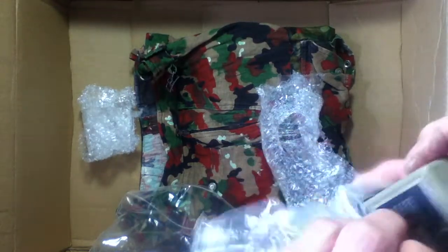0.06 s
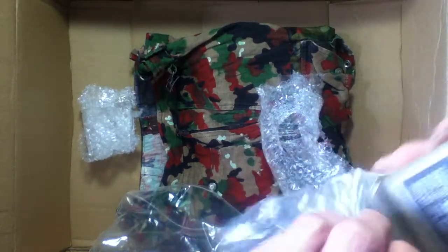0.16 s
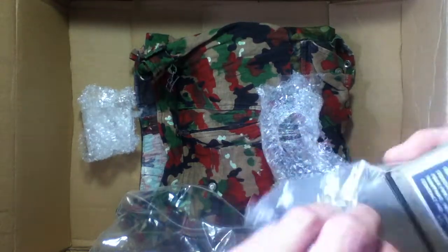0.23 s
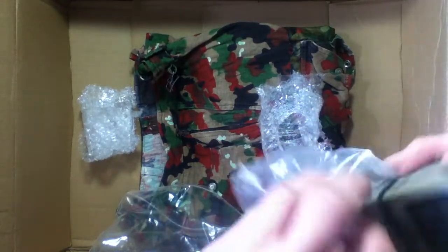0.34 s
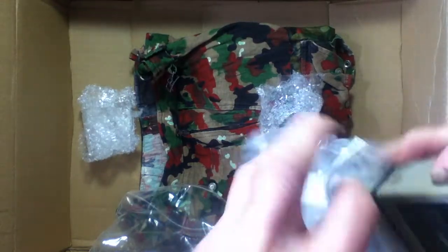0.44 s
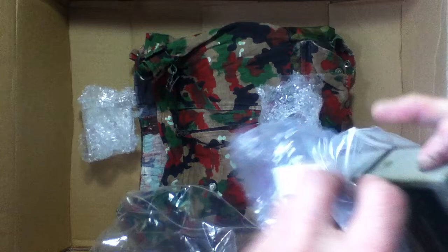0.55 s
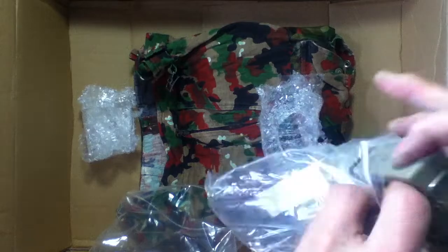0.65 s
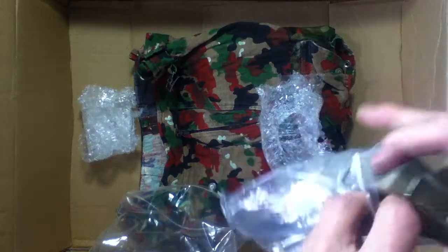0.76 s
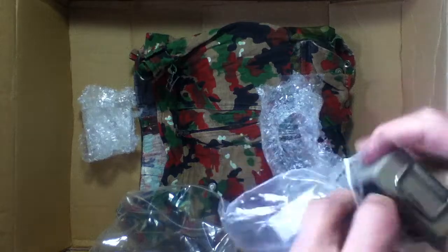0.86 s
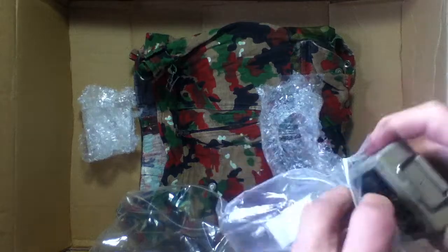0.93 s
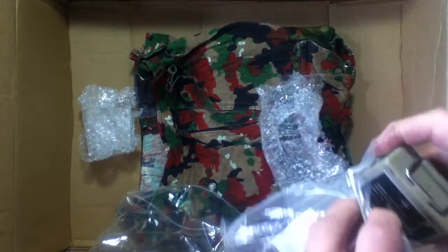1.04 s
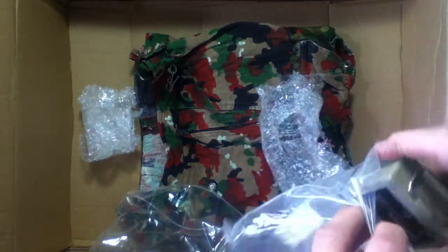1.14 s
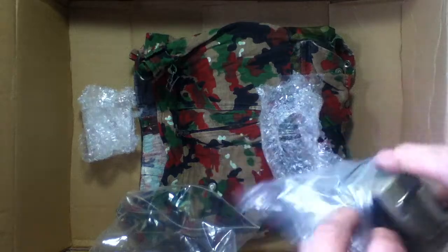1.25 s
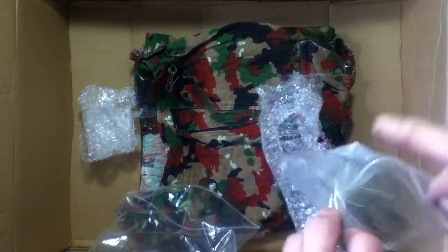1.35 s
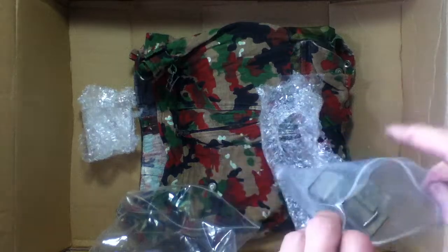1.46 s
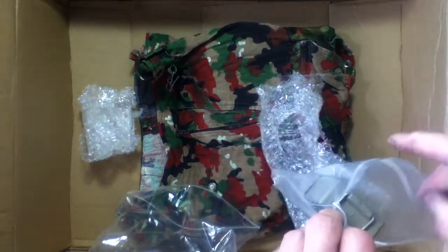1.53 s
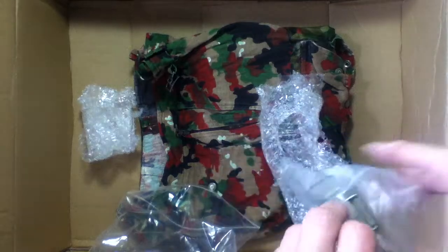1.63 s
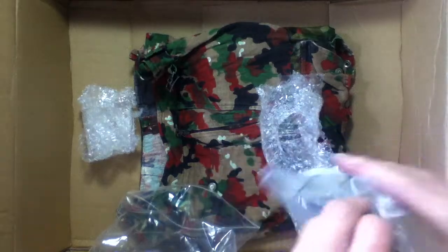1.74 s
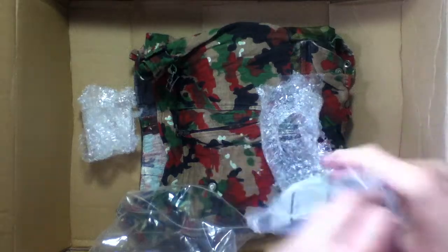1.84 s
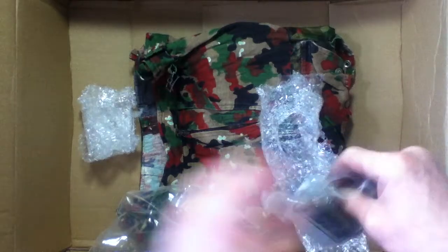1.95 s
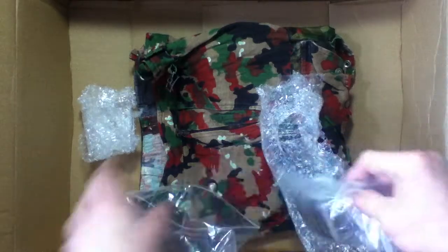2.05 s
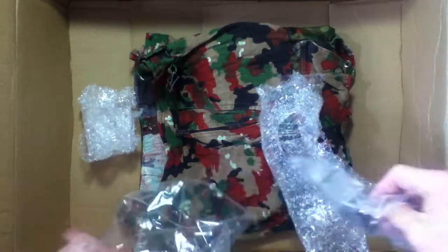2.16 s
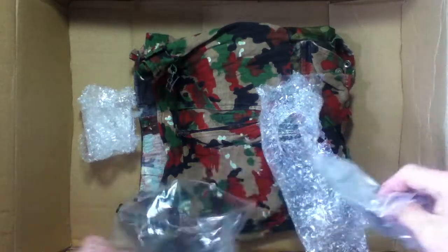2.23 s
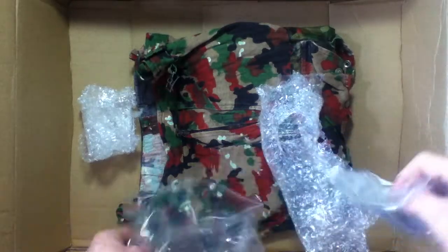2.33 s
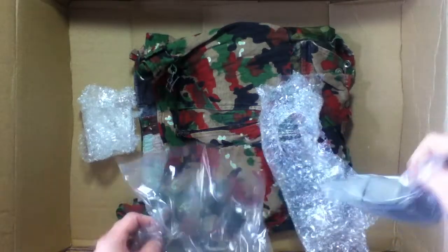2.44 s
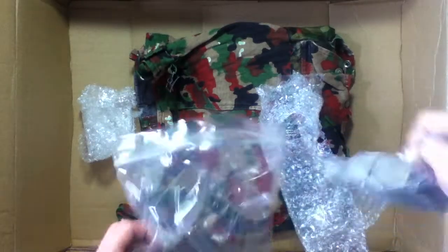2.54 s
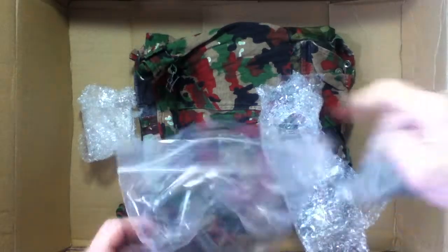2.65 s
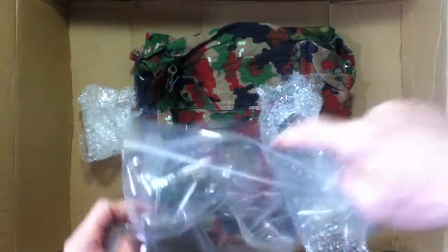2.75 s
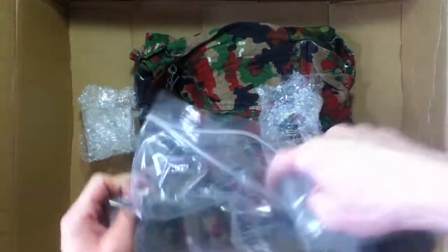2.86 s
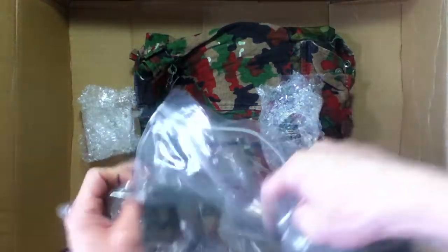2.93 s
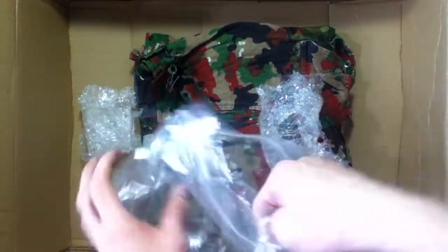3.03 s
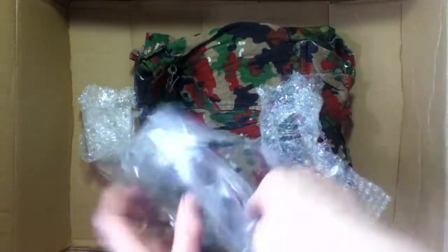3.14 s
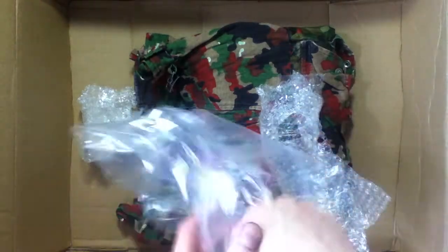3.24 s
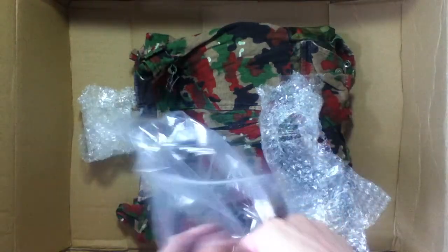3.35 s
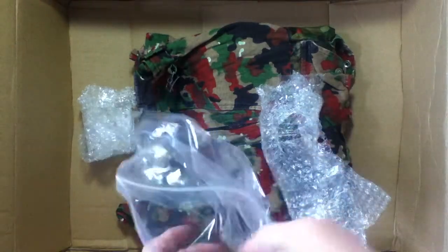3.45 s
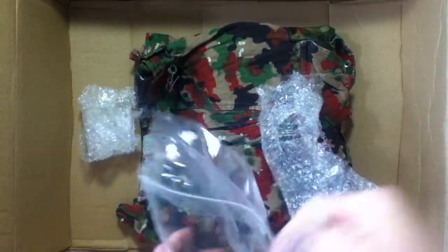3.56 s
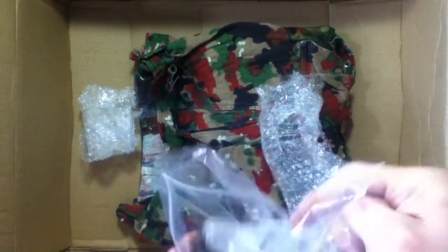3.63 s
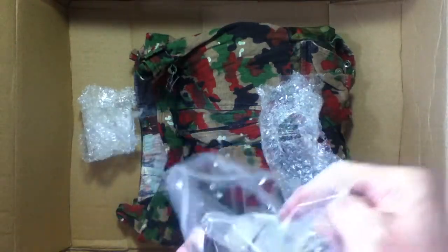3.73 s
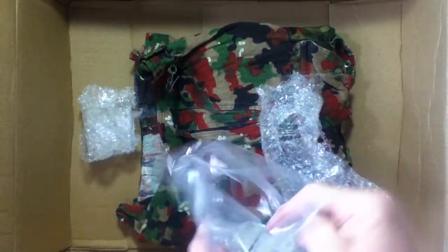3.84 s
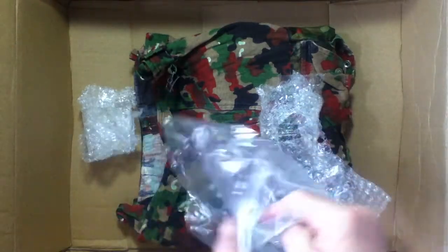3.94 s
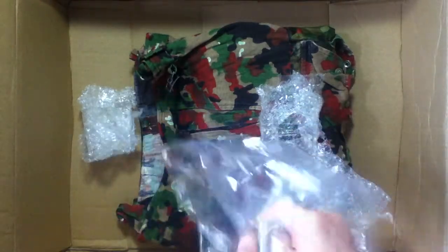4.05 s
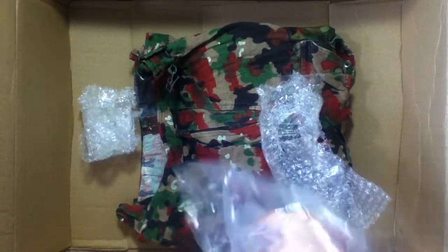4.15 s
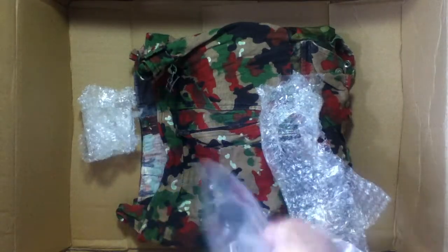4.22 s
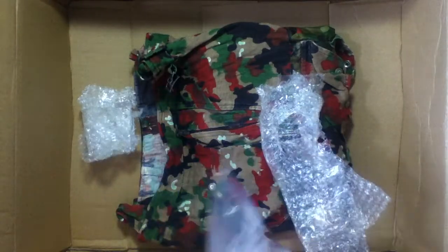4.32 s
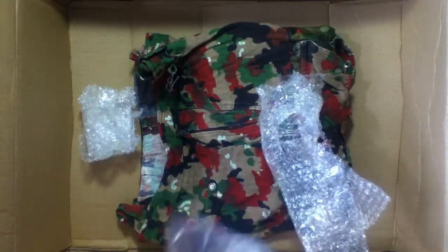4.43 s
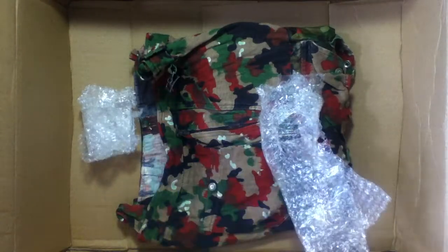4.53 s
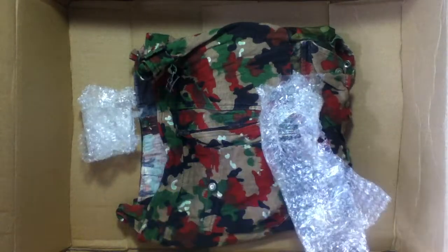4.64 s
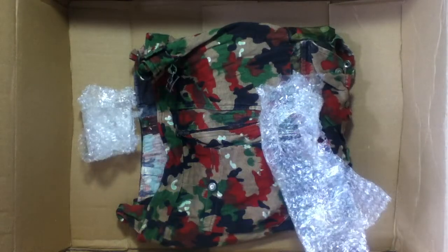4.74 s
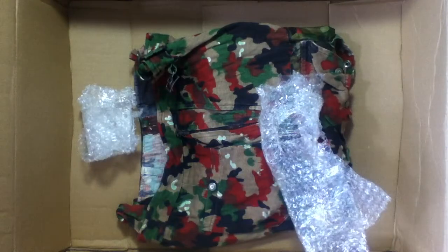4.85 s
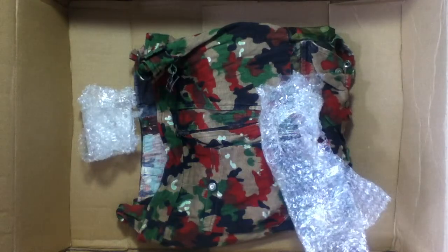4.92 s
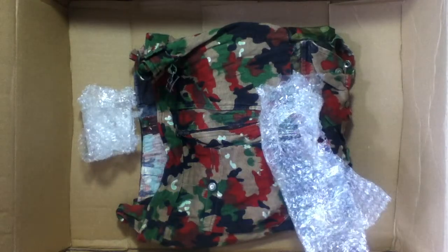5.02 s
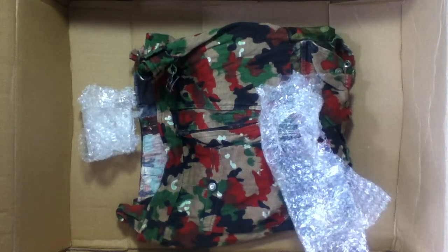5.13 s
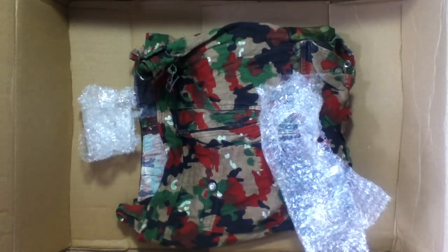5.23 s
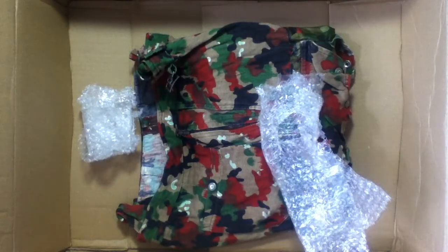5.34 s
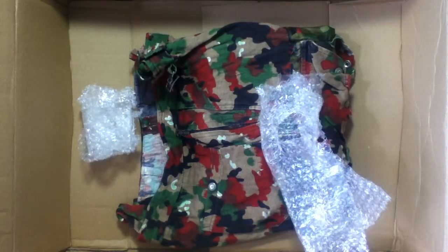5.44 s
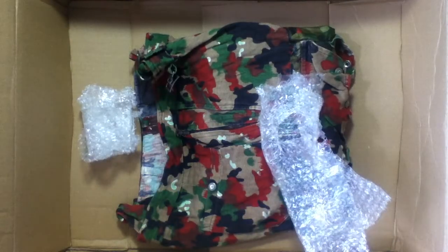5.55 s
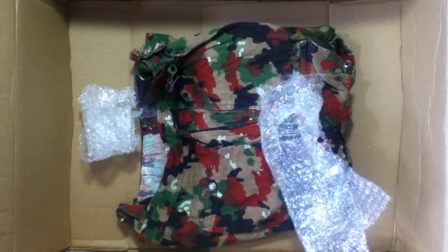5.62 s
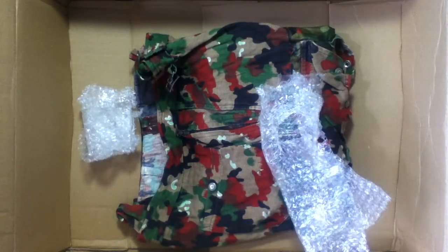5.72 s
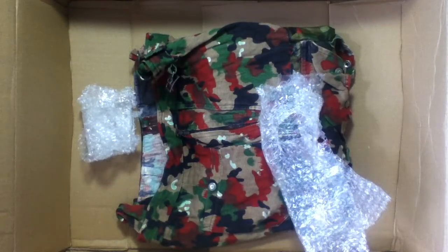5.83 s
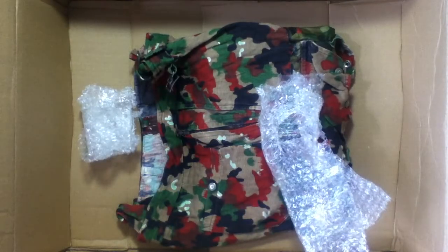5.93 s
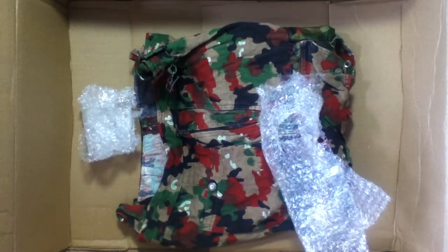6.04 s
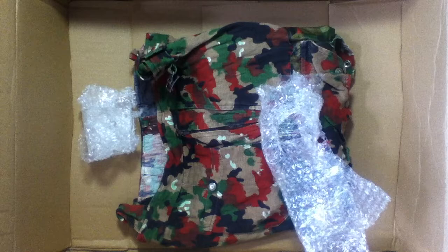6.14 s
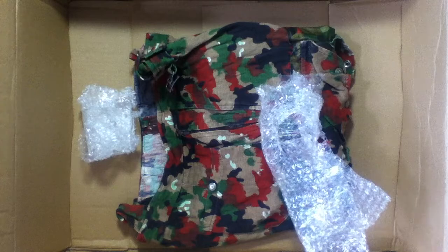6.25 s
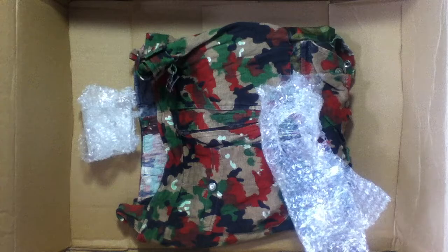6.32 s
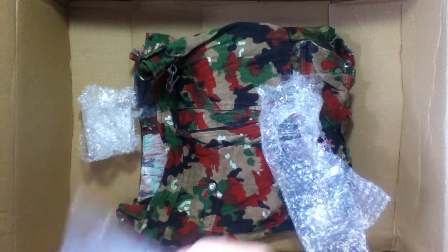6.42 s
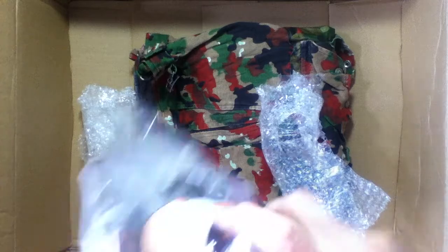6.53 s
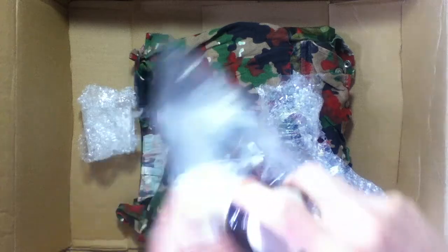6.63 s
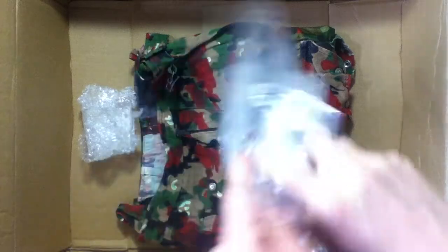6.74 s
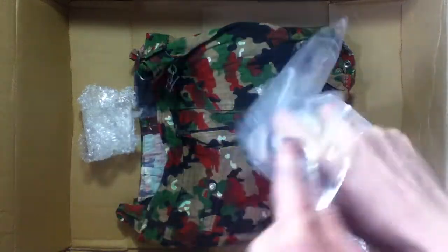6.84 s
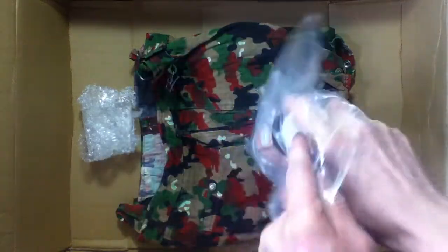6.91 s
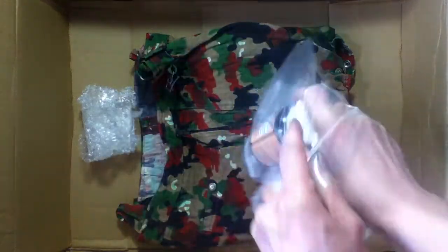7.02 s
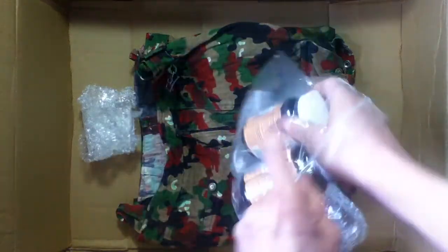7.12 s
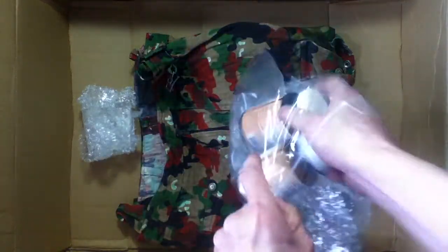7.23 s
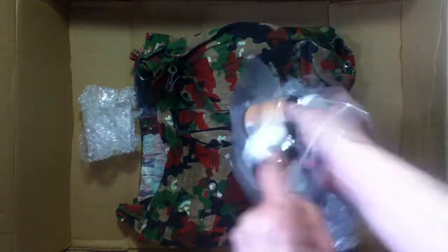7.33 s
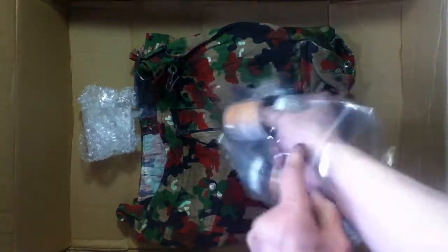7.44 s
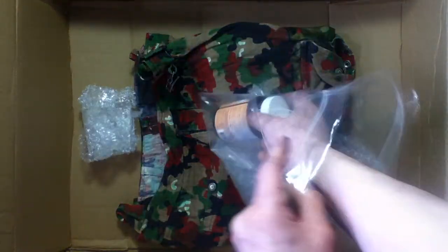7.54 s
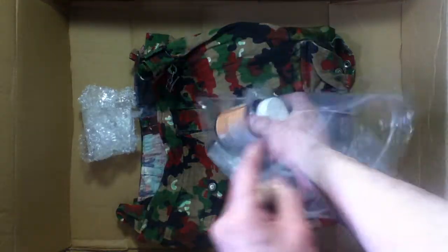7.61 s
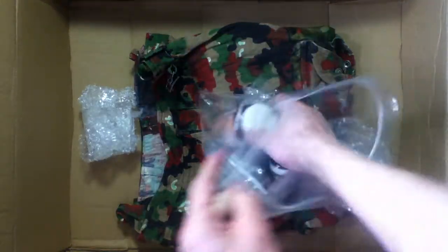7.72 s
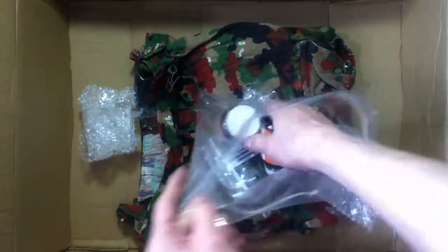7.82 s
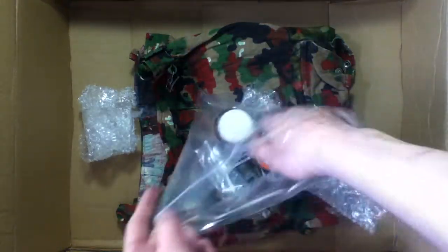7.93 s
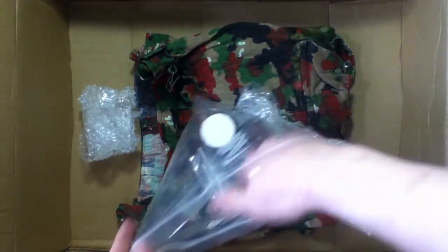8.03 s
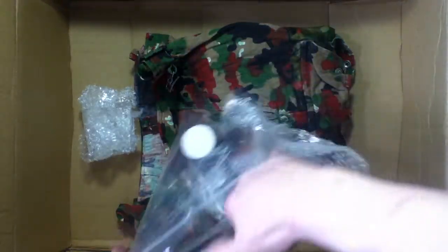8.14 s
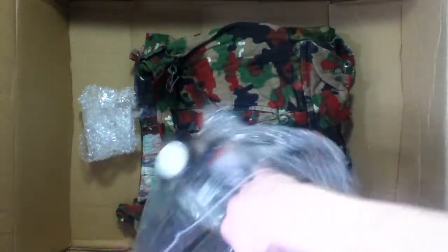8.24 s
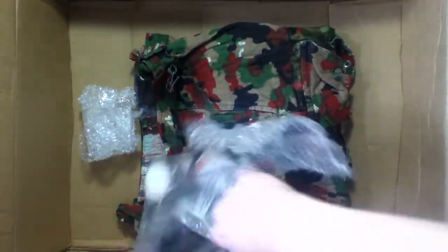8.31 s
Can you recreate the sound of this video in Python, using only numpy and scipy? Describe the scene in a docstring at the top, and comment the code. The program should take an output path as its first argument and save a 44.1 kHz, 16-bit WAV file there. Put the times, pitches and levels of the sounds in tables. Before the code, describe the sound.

Hands crumple plastic wrapping over a cardboard box, knocking the box, before a small hard object rattles and clicks sharply.

```python
"""Over an open cardboard box, close to the microphone, hands crumple a thin plastic bag and bubble wrap.
The film buckles in clumps of tiny snaps and some loud cracks, over a sliding hiss and a low rustle.
Knuckles bump the box and its panel booms. Late on, a small hard object with a metal part drags and
rattles, then clicks once sharply. Reflections from the box and the room follow, above a faint hush."""
import sys
import numpy as np
from scipy import signal
from scipy.fft import rfft, irfft, next_fast_len
from scipy.io import wavfile

SR = 44100
rng = np.random.default_rng(int(sys.argv[2]) if len(sys.argv) > 2 else 0)


def int16_out(signal):
    """Quantize to a 16-bit WAV file."""
    q = np.round(np.clip(np.atleast_2d(signal).T, -1, 1) * 32767)
    wavfile.write(sys.argv[1], SR, q.astype(np.int16))


N = 369293

# Levels are relative, ahead of filters and reflections.
# spectrum of the background hush: frequency_hz, density_db
HUSH_SPECTRUM = [(15, -50), (25, 0), (113, -6.5), (371, -11.5), (540, -16), (834, -13.5), (1400, -21),
                 (4500, -22), (15800, -26)]
# knuckles on the box: start_s, level_db, pitch_hz, t60_s
KNUCKLE_BUMPS = [(1.511, -23.5, 121, 0.047), (2.317, -35.5, 174, 0.12), (2.722, -41.5, 223, .06),
                 (3.346, -37, 280, 0.12), (4.405, -8.5, 161, 0.15), (4.603, -31.5, 155, 0.39),
                 (5.078, -40, 357, 0.036), (5.62, -33, 388, 0.039), (6.748, -27, 634, 0.054)]
# modes of the metal part: pitch_hz, level_db, t60_s
METAL_MODES = [(4240, -1, 0.01), (6420, -5, .03), (6630, -11, 0.1), (9400, -12, 0.045), (9660, -3, 0.045),
               (10750, -9, 0.02)]
# the object dragging over a rough edge: time_s, casing_db, metal_db
DRAG_LEVELS = [(6.19, -87, -88), (6.21, -55, -56), (6.31, -60, -58), (6.317, -34, -66), (6.41, -39, -66),
               (6.44, -55, -68), (6.46, -72, -86)]
# impacts of the object: start_s, level_db, casing_pitch_hz, metal_gain_db
OBJECT_IMPACTS = [(6.3135, -25, 2100, -30), (6.3178, -14, 2130, -30), (6.342, -19, 2150, -16),
                  (6.3645, -17, 2000, -16), (6.3895, -18, 2000, -21), (6.4035, -19, 2130, -32),
                  (6.414, -22, 1900, -22), (6.436, -27, 1850, -26), (7.7539, 2, 2500, -11),
                  (7.7712, -13, 2000, -8), (8.17, -28, 1500, -26)]
# squeezes and tugs of the film: full_grip_s, held_s, level_db
SQUEEZES = [(0.0, 0.014, -37), (0.192, 0.038, -38), (0.519, 0.017, -39), (0.769, 0.043, -34),
            (1.02, 0.047, -43), (1.38, 0.083, -39), (1.516, 0.0063, -21.5), (1.798, 0.0091, -36.5),
            (2.069, 0.034, -30.5), (2.188, 0.016, -33.5), (2.362, 0.14, -40.5), (2.597, 0.016, -33),
            (2.679, 0.019, -38.5), (3.12, 0.018, -40.5), (3.26, 0.024, -40.5), (3.35, 0.013, -31.5),
            (3.449, 0.085, -39.5), (3.678, 0.003, -42), (3.97, 0.11, -45), (4.138, 0.1, -35),
            (4.318, 0.083, -30), (4.51, 0.037, -37), (4.68, 0.086, -42.5), (4.84, 0.024, -35),
            (5.14, 0.065, -53), (5.75, 0.018, -58.5), (6.641, 0.0046, -38), (6.84, 0.14, -34),
            (7.03, 0.031, -35), (7.231, 0.035, -32.5), (7.419, 0.14, -32.5), (7.654, 0.07, -30.5),
            (7.94, 0.074, -43), (8.32, 0.046, -39.5)]
# crinkle of the film carried between squeezes: time_s, level_db
CARRY_LEVELS = [(0.0, -63), (0.3, -41.5), (1.4, -44.5), (1.62, -56), (1.85, -37), (2.2, -45.5),
                (2.9, -48.5), (3.2, -42), (3.6, -50), (3.8, -80), (3.98, -35.5), (4.85, -45), (4.97, -58.5),
                (5.9, -66), (6.05, -79), (6.45, -79.5), (6.8, -39), (7.11, -41), (7.7, -36.5),
                (7.77, -49.5), (8.37, -58.5)]
# tone balance of the film: time_s, rustle_gain_db, treble_lift_db
FILM_BALANCE = [(0, -6.5, -0.5), (0.698, -10, 5.5), (1.52, -6.5, 1), (2.2, -11, 2), (3.7, -5.5, -0.5),
                (5.0, -6.5, 3), (5.8, 2, 0), (6.4, -9, 0), (6.75, -2.5, 1), (7.1, -9, 3.5),
                (8.37, -5.5, -1.5)]
# spectrum of the low rustle: frequency_hz, density_db
RUSTLE_SPECTRUM = [(18, -50), (30, -8), (319, -1.5), (1300, -3), (1690, -4), (2860, -120)]
# loud single creases: start_s, level_db, pitch_hz
CREASE_CRACKS = [(0.0629, -13.5, 4100), (0.159, -14.5, 2120), (0.236, -15, 8000), (0.31, -10.5, 4500),
                 (0.3696, -11, 3130), (0.4812, -12, 4230), (0.648, -13, 4760), (0.9165, -15, 1460),
                 (1.1992, -11.5, 3160), (1.233, -2.5, 3220), (1.2769, -13, 3770), (1.366, -10.5, 2980),
                 (1.503, -12, 3500), (1.5128, -11, 3300), (1.5171, -3.5, 5600), (1.5198, -7, 1100),
                 (1.525, -12, 2400), (1.53, -14, 3800), (1.82, -20, 1810), (1.865, -18, 2820),
                 (1.984, -13, 6000), (2.1544, -11.5, 3400), (2.1945, -12.5, 2250), (2.2342, -11.5, 4240),
                 (2.448, -16, 2900), (2.5836, -18, 3950), (2.7918, -15, 5300), (3.122, -21, 2030),
                 (3.1982, -12.5, 4270), (3.2736, -12, 3760), (3.3448, -16, 4900), (3.501, -20, 3800),
                 (3.5432, -1.5, 3700), (3.665, -14, 3100), (3.693, -14.5, 4330), (3.829, -29, 3100),
                 (3.8431, -19.5, 3600), (3.905, -25, 3120), (3.9587, -9.5, 2500), (3.9915, -8, 4070),
                 (4.1265, -11.5, 1640), (4.8209, -14.5, 1160), (4.9971, -32, 1930), (5.008, -31, 4170),
                 (5.0259, -28.5, 1390), (5.082, -27, 8550), (5.114, -25, 6000), (5.2299, -20, 3700),
                 (5.3471, -24, 4500), (5.508, -28.5, 4520), (5.8462, -24.5, 5240), (5.901, -18.5, 7760),
                 (6.4627, -15, 6560), (6.6339, -16.5, 2280), (6.751, -10, 6250), (6.771, -13, 3970),
                 (6.832, -5.5, 2600), (7.05, -7.5, 5000), (7.4115, -7.5, 6000), (7.442, -8, 5930)]
# spectrum imposed on the crinkle: frequency_hz, gain_db
FILM_SPECTRUM = [(530, -18), (900, -10.5), (2160, -3.5), (2740, -1.5), (6590, -5.5), (12400, -16),
                 (15800, -21.5)]

USUAL_EFFORT_DB = -40   # reference for firm and light handling
TIME_S = np.arange(N) / SR


def from_db(db):
    """Decibels to amplitude ratio."""
    return 10 ** (np.asarray(db) / 20)


def rms_one(x):
    """Normalisation to unit rms."""
    return x / np.sqrt(np.mean(x ** 2) + 1e-20)


def butterworth(x, hz, kind):
    """Maximally flat filtering."""
    return signal.sosfilt(signal.butter(2, hz, kind, fs=SR, output="sos"), x)


def coloured(x, spectrum):
    """Spectral shaping along a log-frequency curve, at unit rms."""
    size = next_fast_len(N)
    hz = np.maximum(np.arange(size // 2 + 1) * SR / size, 1)
    points_hz, points_db = np.transpose(spectrum)
    gain = from_db(np.interp(np.log(hz), np.log(points_hz), points_db))
    return rms_one(irfft(rfft(x, size) * gain, size)[:N])


def drift(rate_hz):
    """Low-passed noise: a slow random fluctuation of about unit spread."""
    r = np.exp(-2 * np.pi * rate_hz / SR)
    return rms_one(signal.lfilter([1], [1, -2 * r, r * r], rng.standard_normal(N + SR))[SR:])


def ring(force, hz, t60):
    """Damped resonator: a unit impulse starts a decaying sine of height 1."""
    r, w = 10 ** (-3 / (t60 * SR)), 2 * np.pi * hz / SR
    return signal.lfilter([0, np.sin(w)], [1, -2 * r * np.cos(w), r * r], force + 1e-18)


def fade(t60, size):
    """Exponential decay of 60 dB in t60 seconds."""
    return 10 ** (-3 * np.arange(size) / SR / t60)


def add(out, start_s, sound, peak_db):
    """Superposition of one event at a given peak level."""
    i = round(start_s * SR)
    out[i:i + len(sound)] += (from_db(peak_db) * sound / np.abs(sound).max())[:N - i]


def hush():
    """Stationary noise, strongest in the bass, forms a faint floor."""
    return from_db(-55) * coloured(rng.standard_normal(N), HUSH_SPECTRUM)


def reverberate(x, level_db, t60, hop_s):
    """Reverberation: dense reflections join the direct sound, their pattern changing as the hands move."""
    hop, size = int(hop_s * SR), int(t60 * SR)
    out, window = np.zeros(N + 4 * hop + size), np.hanning(2 * hop)
    padded = np.concatenate([np.zeros(hop), x, np.zeros(2 * hop)])
    for i in range(0, N + hop, hop):
        tail = rng.standard_normal(size) * fade(t60, size)
        piece = signal.fftconvolve(padded[i:i + 2 * hop] * window, tail / np.sqrt(np.sum(tail ** 2)))
        out[i:i + len(piece)] += piece
    return x + from_db(level_db) * out[hop:hop + N]


def box_bumps(scuff_db):
    """Panel resonance: a soft knuckle pushes the cardboard in and out; it booms and the skin scuffs."""
    out, size = np.zeros(N), SR // 3
    for start_s, db, hz, t60 in KNUCKLE_BUMPS:
        push, length = np.zeros(size), int(1.6 * SR / hz)
        push[:length] = np.hanning(length) * np.sin(2 * np.pi * hz * np.arange(length) / SR)
        boom = ring(push, hz, t60) + .5 * ring(push, hz * .72, t60) + .5 * ring(push, hz * 1.6, t60 * .55)
        hand_damping = .12 + np.exp(-(np.arange(size) * hz / SR / 6.8) ** 6)
        add(out, start_s, boom * hand_damping, db)
        rub = rng.standard_normal(size)[:3 * length] * np.hanning(3 * length)
        add(out, start_s, butterworth(rub, [.5 * hz, 2 * hz], "band"), min(scuff_db, db))
    return out


def object_drag(slips_per_s, casing_hz, casing_t60):
    """Stick-slip friction: dense uneven slips keep the casing and the middle metal modes sounding."""
    times_s, casing_db, metal_db = np.transpose(DRAG_LEVELS)
    slips = (rng.random(N) < slips_per_s / SR) * rng.standard_normal(N)
    slips *= from_db(2.6 * np.minimum(rng.exponential(1, N), 2))
    grit = rms_one(butterworth(slips, [2600, 6000], "band"))
    # the lower casing mode takes over as the drag slows
    late = np.clip((TIME_S - times_s[3]) / (times_s[5] - times_s[3]), 0, 1)
    upper = ring(slips * (1 - late / 2), casing_hz, casing_t60)
    lower = ring(slips * late, casing_hz * .9, casing_t60)
    casing = rms_one(upper + lower) + from_db(-8) * grit
    casing *= from_db(np.interp(TIME_S, times_s, casing_db))
    metal = rms_one(sum(ring(slips, hz, t60) for hz, _, t60 in METAL_MODES[1:4]))
    return casing + from_db(np.interp(TIME_S, times_s, metal_db)) * metal


def object_impacts(base_t60, chatter_t60, crack_db):
    """Impact excitation: each contact cracks drily and rings the casing and its own mix of metal modes."""
    out, size = np.zeros(N), SR // 4
    noise = rng.standard_normal((len(OBJECT_IMPACTS), size))
    scatter_db = rng.normal(0, 1.5, (len(OBJECT_IMPACTS), len(METAL_MODES)))
    for (start_s, db, hz, metal_db), white, offsets_db in zip(OBJECT_IMPACTS, noise, scatter_db):
        push = white * fade(chatter_t60, size)
        push = .97 * push / np.sqrt(np.sum(push ** 2))
        push[0] = 1   # a clean first touch, then chatter
        # blows on the metal leave the casing drier and wake more of its modes
        knock_t60 = base_t60 * from_db(-.3 * (metal_db + 28))
        side_modes = ring(push, hz * .7, knock_t60) + ring(push, hz * 1.28, knock_t60)
        casing = ring(push, hz, knock_t60) + from_db(1.3 * (metal_db + 8)) * side_modes
        metal = sum(from_db(mode_db + offset_db) * ring(push, mode_hz, t60)
                    for (mode_hz, mode_db, t60), offset_db in zip(METAL_MODES, offsets_db))
        crack = butterworth(push, [1200, 6500], "band")
        add(out, start_s, casing + from_db(metal_db) * metal + from_db(crack_db) * crack, db)
    return butterworth(out, 1100, "high")


def handling_db(rise_db_per_s, fall_db_per_s):
    """Incoherent powers add: each squeeze swells, holds and lets go over the sound of carrying."""
    t = TIME_S[::32]
    power = from_db(2 * np.interp(t, *np.transpose(CARRY_LEVELS)))
    for grip_s, held_s, db in SQUEEZES:
        before_s, after_s = np.maximum(grip_s - t, 0), np.maximum(t - grip_s - held_s, 0)
        loss_db = rise_db_per_s * before_s + fall_db_per_s * after_s
        quickness = from_db(.22 * (db - USUAL_EFFORT_DB))   # firmer squeezes scale both rates up
        power += from_db(2 * (db - loss_db * quickness))
    return np.interp(TIME_S, t, 10 * np.log10(power))


def fold_rustle(clumps):
    """Air displacement: large folds and palms on the wrap radiate low noise in step with the clumps."""
    times_s, gain_db, _ = np.transpose(FILM_BALANCE)
    rustle = coloured(rng.standard_normal(N) * clumps ** .67, RUSTLE_SPECTRUM)
    return rustle * from_db(np.interp(TIME_S, times_s, gain_db))


def crease_cracks(ring_cycles, tail_t60, tail_db):
    """Snap-through: a crease flips with a broad burst, a short ring and a dying rattle of the film."""
    out, size = np.zeros(N), SR // 10
    envelope = fade(.002, size) + from_db(tail_db) * fade(tail_t60, size)
    for start_s, db, hz in CREASE_CRACKS:
        push = rng.standard_normal(size) * envelope
        tone = ring(push, hz, ring_cycles / hz)
        burst = butterworth(push, [1900, 8500], "band")
        add(out, start_s, rms_one(tone) + rms_one(burst), db)
    return out


def film_crinkle(effort_db, base_snaps_per_s, ring_cycles):
    """Buckling: facets snap and ring in clumps over a sliding hiss. Returns sound and clump envelope."""
    activity = np.clip(rms_one(from_db(effort_db)), .1, 3.5) ** .45   # light handling snaps less often
    sizes = from_db(6 * np.minimum(rng.exponential(1, N), 3.1))
    sizes *= rng.choice([-1, 1], N) / np.sqrt(activity)
    clumps = from_db(5 * drift(rate_hz=35))
    buckles = sizes * (rng.random(N) < base_snaps_per_s * activity * clumps / SR)
    facet, snaps = rng.integers(0, 16, N), np.zeros(N)
    for k, hz in enumerate(np.geomspace(900, 14000, 16)):
        ringing = ring(buckles * (facet == k), hz, ring_cycles / hz)
        # a second pass through the resonance keeps each snap in its own band
        snaps += (hz / SR) ** 1.74 * ring(ringing, hz, ring_cycles / hz)
    hiss = rms_one(rng.standard_normal(N) * np.sqrt(clumps * activity))
    hiss_gain = from_db(-4.5 + .14 * (effort_db - USUAL_EFFORT_DB))   # firmer handling hisses more
    blend = (rms_one(snaps) + hiss_gain * hiss) / np.sqrt(1 + hiss_gain ** 2)
    film = coloured(blend, FILM_SPECTRUM)
    times_s, _, lift_db = np.transpose(FILM_BALANCE)
    extra_treble = from_db(np.interp(TIME_S, times_s, lift_db)) - 1
    return film + extra_treble * butterworth(film, 6000, "high"), clumps


def scene():
    """Superposition: film and object echo in the box and the room, over rustle, booms and hush."""
    effort_db = handling_db(rise_db_per_s=216, fall_db_per_s=214)
    film, clumps = film_crinkle(effort_db, base_snaps_per_s=850, ring_cycles=3.13)
    rustle = from_db(effort_db) * fold_rustle(clumps)
    near = from_db(effort_db + 2) * film
    near += crease_cracks(ring_cycles=6, tail_t60=.045, tail_db=-21)
    near += object_impacts(base_t60=.019, chatter_t60=.012, crack_db=9)
    near += object_drag(slips_per_s=900, casing_hz=2120, casing_t60=.013)
    near = butterworth(near, 700, "high")   # the near sounds carry little below 700 Hz
    in_box = reverberate(near, level_db=-6.5, t60=.036, hop_s=.03)
    in_room = reverberate(in_box, level_db=-11.5, t60=.27, hop_s=.08)
    # the hollow box rumbles on after each bump
    booms = reverberate(box_bumps(scuff_db=-41), level_db=-15, t60=.25, hop_s=.044)
    return (hush() + booms + rustle + in_room)[None]


def record(dry):
    """Band limiting: the small microphone loses the deep bass, and the top is cut steeply."""
    thin = butterworth(dry, 91.5, "high")
    return signal.sosfilt(signal.cheby2(12, 60, 16300, fs=SR, output="sos"), thin)


dry = scene()
out = record(dry)
int16_out(out)
```